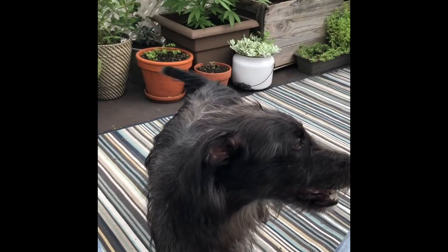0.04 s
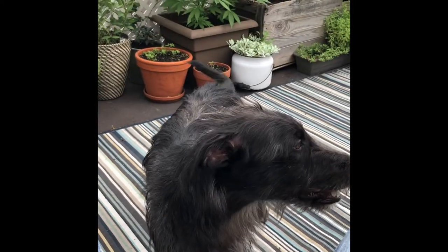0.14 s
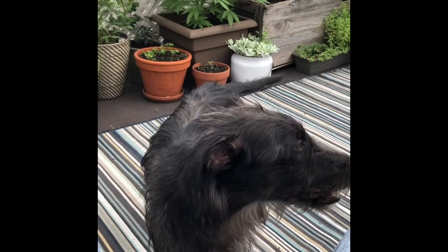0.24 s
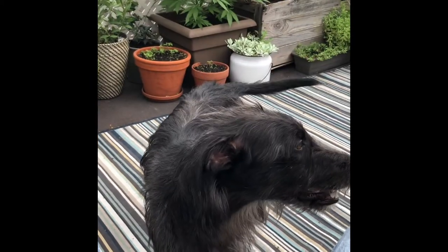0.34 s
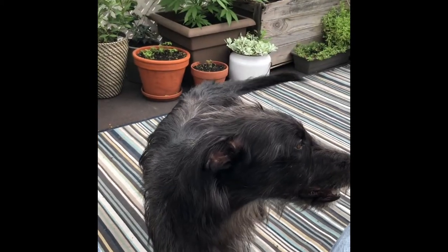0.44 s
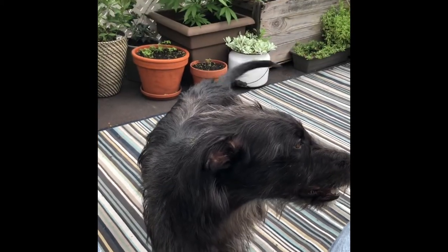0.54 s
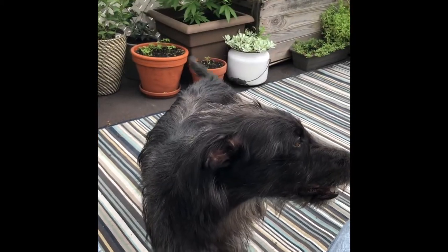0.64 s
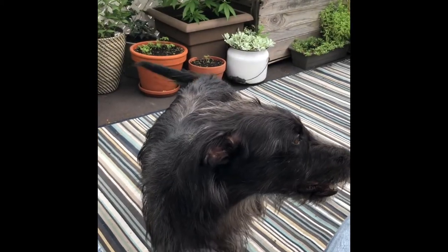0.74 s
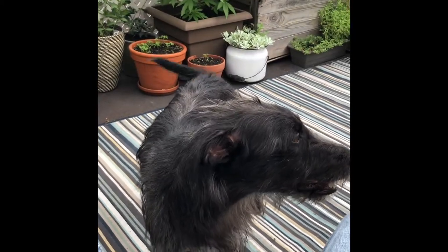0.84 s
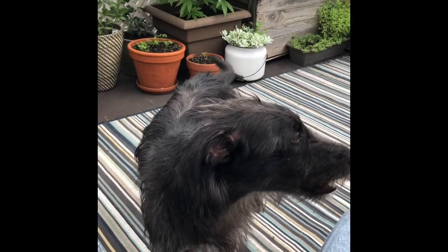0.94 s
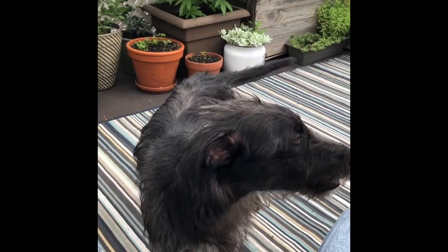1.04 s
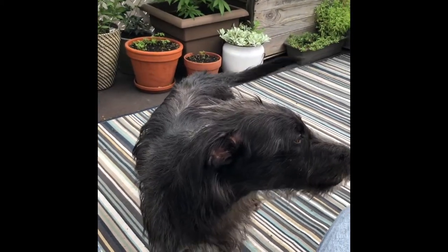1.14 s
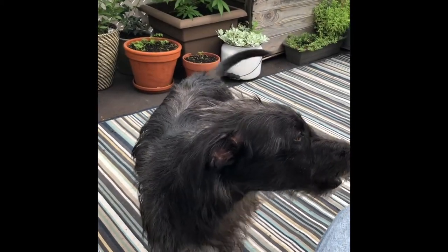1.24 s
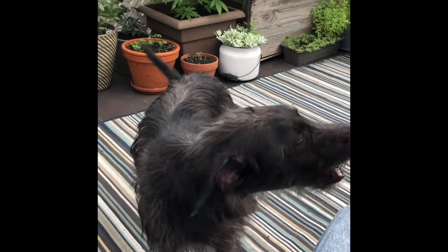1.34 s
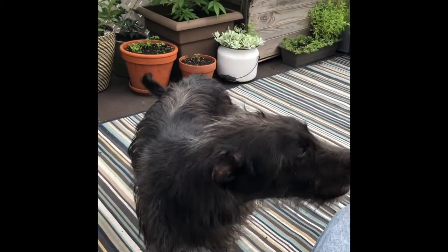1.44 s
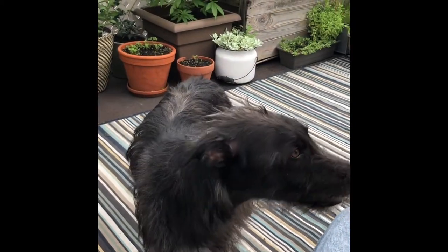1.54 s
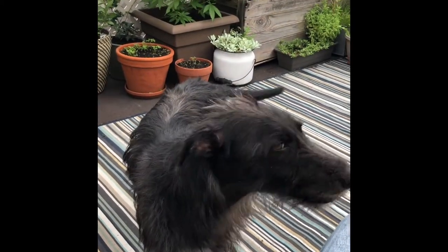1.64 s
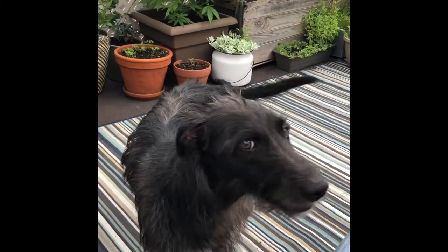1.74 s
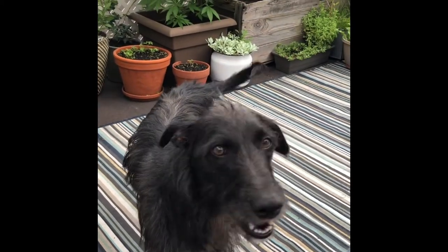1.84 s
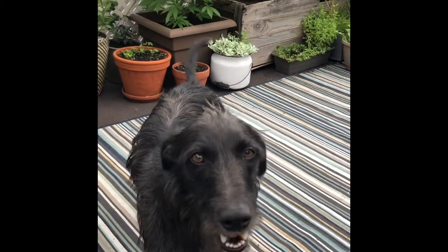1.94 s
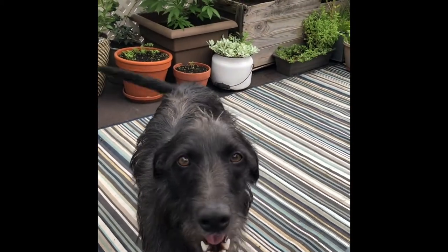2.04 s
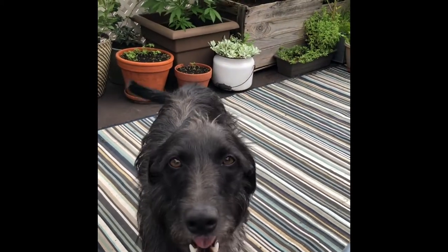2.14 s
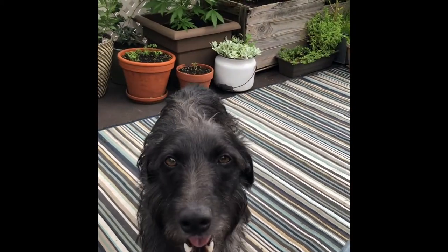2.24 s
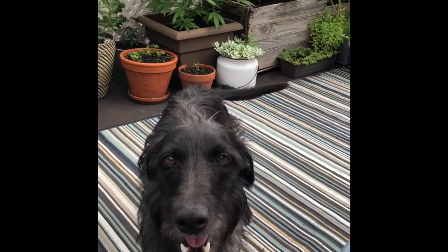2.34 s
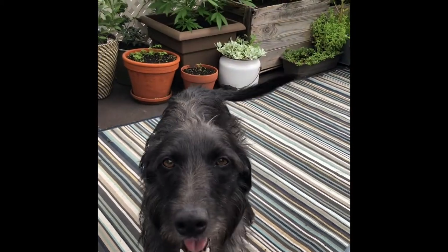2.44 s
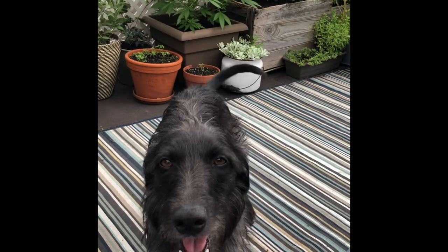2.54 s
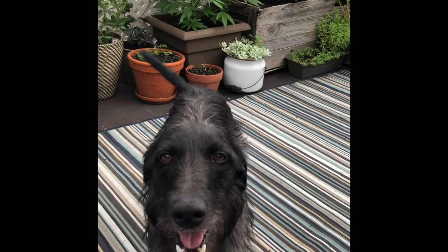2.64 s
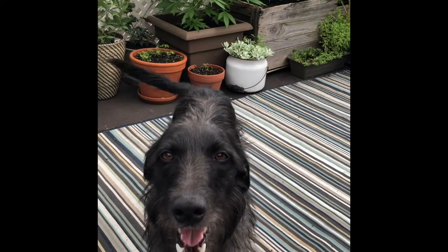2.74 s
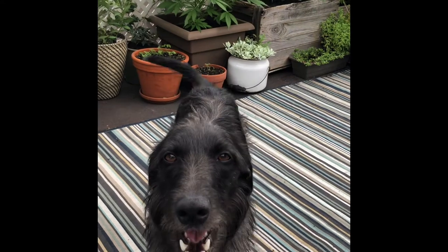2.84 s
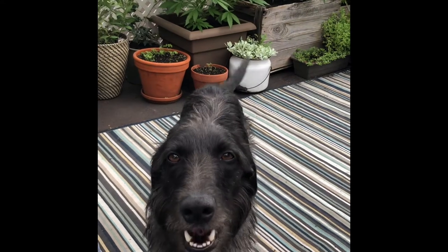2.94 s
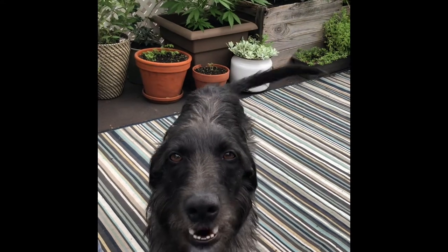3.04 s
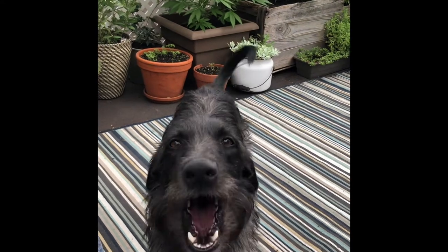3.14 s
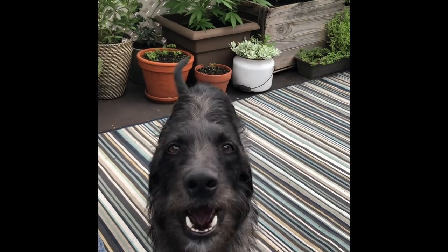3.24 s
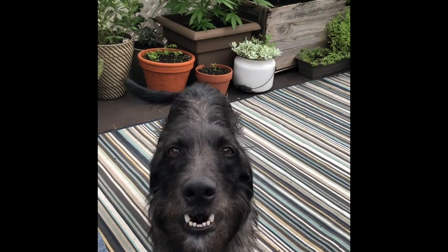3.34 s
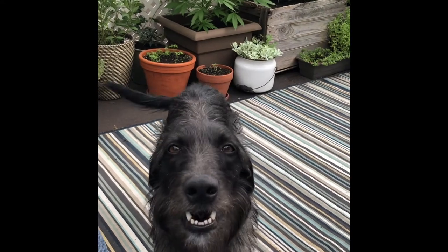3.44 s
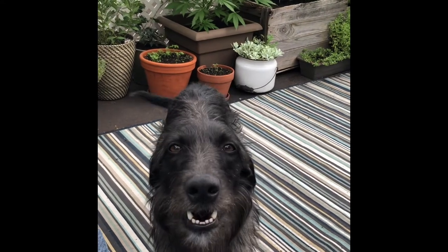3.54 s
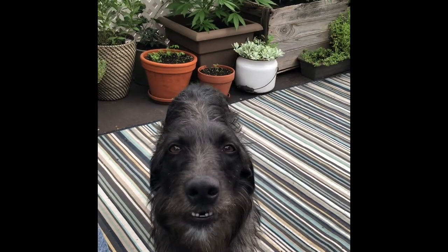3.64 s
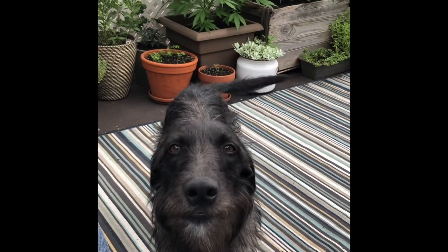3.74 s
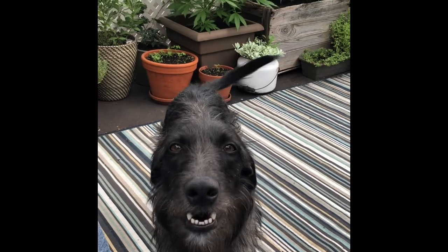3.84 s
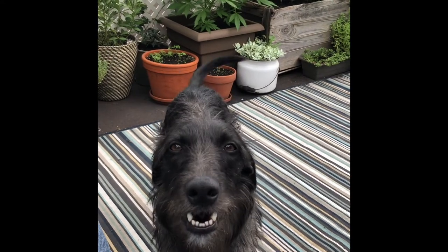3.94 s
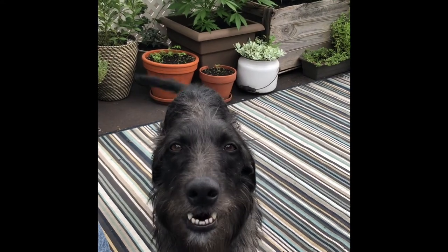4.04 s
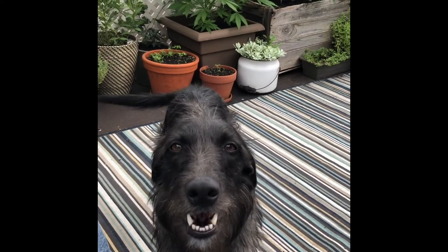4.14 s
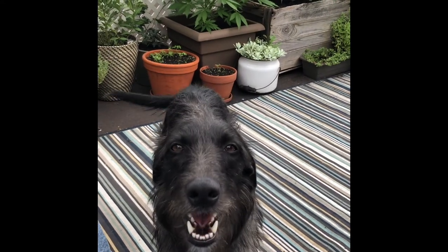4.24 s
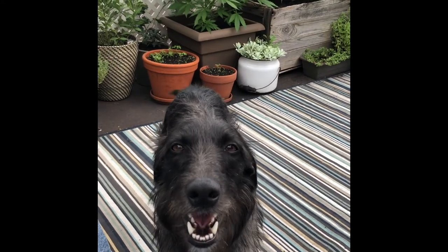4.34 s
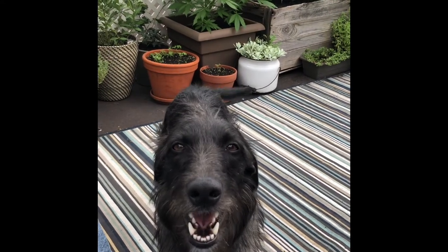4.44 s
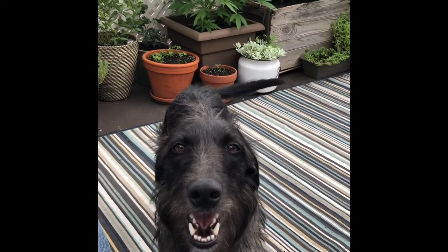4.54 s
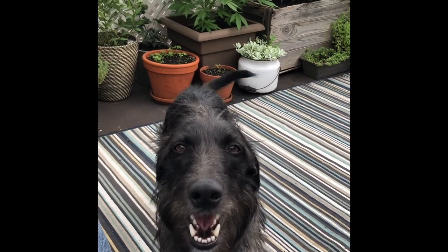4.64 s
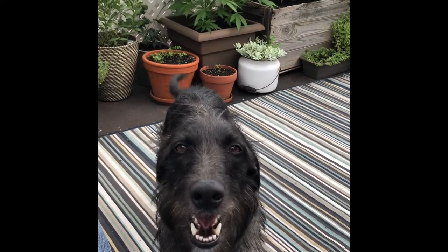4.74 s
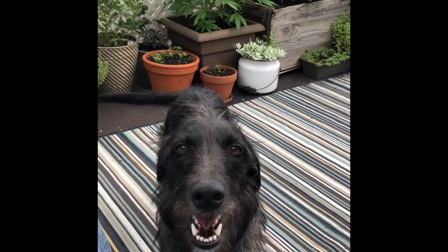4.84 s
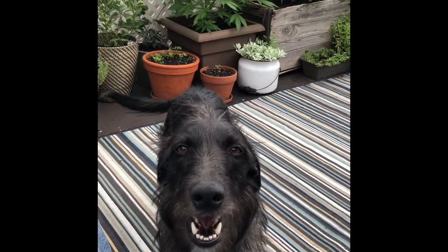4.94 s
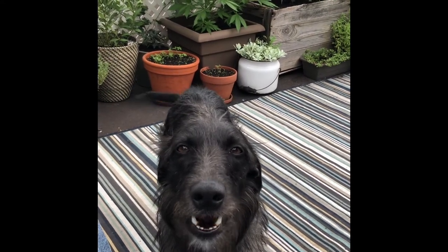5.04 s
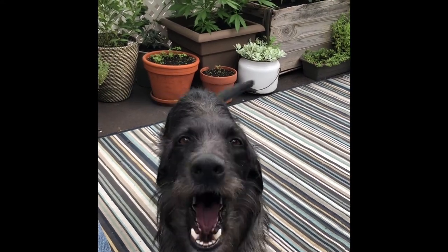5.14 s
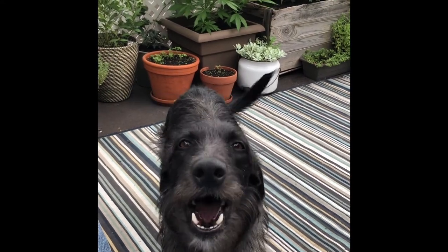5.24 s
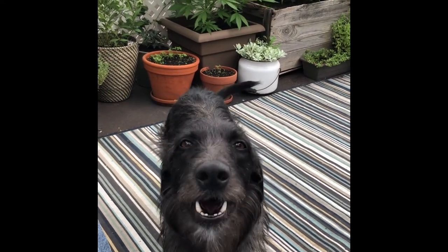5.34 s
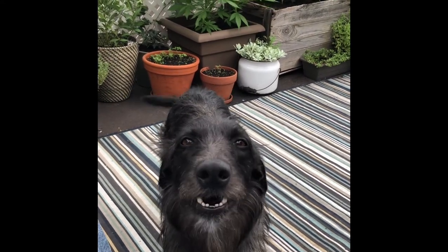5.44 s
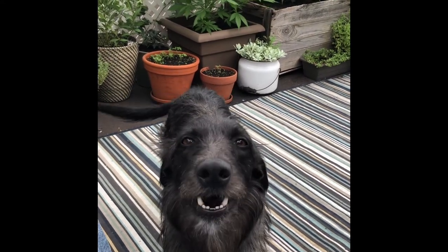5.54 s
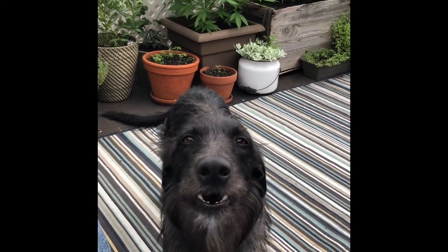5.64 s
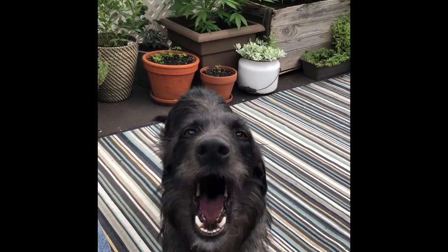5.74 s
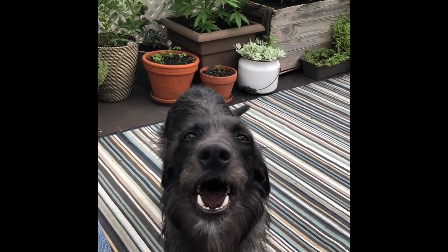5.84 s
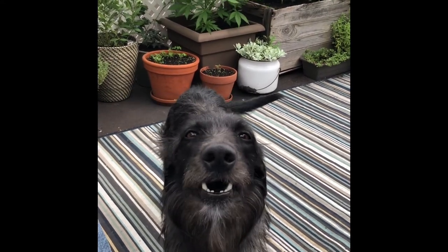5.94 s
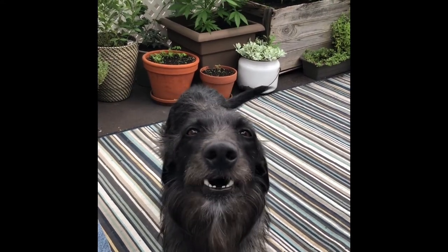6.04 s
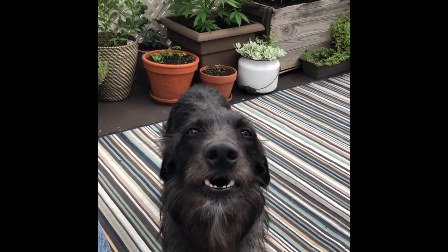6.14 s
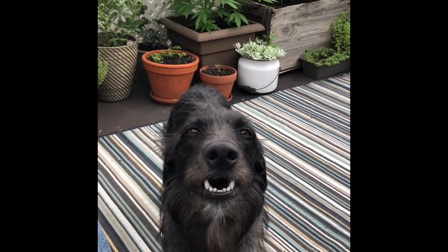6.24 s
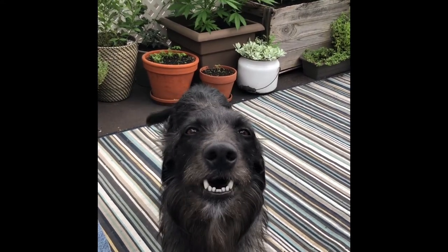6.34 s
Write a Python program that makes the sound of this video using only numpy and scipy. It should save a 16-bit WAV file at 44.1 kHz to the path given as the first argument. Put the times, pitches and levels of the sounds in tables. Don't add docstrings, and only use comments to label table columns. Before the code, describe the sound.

Soft, swelling road rumble and tyre hiss sit far behind a patio. Very near, a big dog lets out four loud, abrupt barks: one turned aside, one facing the microphone, then two in quick succession. Each has a hoarse cracked middle, breathy hiss past the teeth and a low thump of air. Small throat pops and wet lip clicks fill the gaps.

```python
import sys
import numpy as np
from scipy import signal
from scipy.fft import rfft, irfft, next_fast_len
from scipy.io import wavfile
from scipy.ndimage import uniform_filter1d, minimum_filter1d, map_coordinates

SR = 44100
rng = np.random.default_rng(int(sys.argv[2]) if len(sys.argv) > 2 else 0)


def voltage_ratio(decibels):
    exponent = np.asarray(decibels, float) / 20
    return 10 ** exponent


def output_pcm(signal):
    pcm = np.clip(np.atleast_2d(signal).T, -1, 1) * 32767
    wavfile.write(sys.argv[1], SR, np.round(pcm).astype(np.int16))


N = 281490

# (time [s], level [dB])
BACKGROUND_LEVEL = [(0, -59.5), (.25, -57.5), (1.19, -50.5), (1.4, -53), (2.27, -48), (2.72, -45), (3.05, -46),
                    (3.2, -50.5), (3.43, -58), (4.12, -55.5), (5.15, -45.5), (5.4, -53.5), (5.79, -51),
                    (6.04, -54), (6.38, -52.5)]
# (frequency [Hz], density [dB per Hz])
RUMBLE = [(12, -43), (20, -19), (43, -1.5), (86, -4), (120, 0.5), (161, -3.5), (203, -1), (300, -8),
          (338, -23.5), (500, -19.5), (650, -31.5), (1100, -120)]
TYRES = [(150, -29.5), (250, -7.5), (303, -3), (493, -7), (735, -7.5), (831, -9.5), (1450, -12.5),
         (3340, -27.5), (4260, -28.5), (15200, -46), (16000, -50.5)]
TYRES_DB, TYRES_GROW = -56.5, 1.1
# (time [s], pitch [Hz], level [dB])
ENGINE = [(0, 119.3, -77), (2.6, 116, -50), (3.2, 126, -61.5), (4.4, 123, -72.5), (5.3, 132, -54),
          (6.38, 141, -53)]

# (time [s], pitch [Hz], tone [dB], overtone slope [dB per octave], pulses [dB])
GROWL = [(1.149, 325.6, -72, -4, -55), (1.175, 327.3, -73, -6.5, -44.5), (1.211, 351, -70.5, -4, -39.5),
         (1.234, 389, -69.5, -6.5, -31.5), (1.251, 397, -69, -6, -47.5)]
# (frequency [Hz], width [Hz], level [dB])
CHEST = [(230, 63, -3), (480, 68, -0.5), (1250, 95, -19)]
# (time [s], pitch [Hz], tone [dB], overtone slope [dB per octave])
GLIDES = [
    [(1.222, 404.5, -49, -13), (1.243, 445, -24, -5), (1.255, 500.5, -14, -2), (1.267, 557.3, -8.5, -2),
     (1.285, 617.4, -3.5, -6), (1.305, 616.6, -4, -1), (1.32, 672.4, -16, 0), (1.343, 770, -7, -9.5)],
    [(3.085, 470.4, -32.5, -3), (3.091, 480.6, -5.5, -6), (3.11, 529.1, -2, -6.5), (3.128, 595.4, 1, -6),
     (3.145, 671.3, -20, -11.5), (3.175, 787.7, -22, 1), (3.198, 760, -16, -8)],
    [(5.05, 448.2, -55.5, -20), (5.072, 544.2, -13, -17.5), (5.088, 551.4, -6, -10),
     (5.098, 662.4, -9.5, -4), (5.114, 729, 0.5, -6.5), (5.13, 730, -4, -1), (5.142, 766.7, -15, -3),
     (5.203, 789.5, -14.5, -4)],
    [(5.646, 489, -46, -12), (5.66, 506.7, -20, -14), (5.68, 548.8, -14, -5), (5.692, 667.6, -7.5, -6.5),
     (5.715, 722, -2.5, -7), (5.728, 753.5, -13.5, -17), (5.768, 796.3, -14.5, -5)],
]
# (time [s], pulses [dB], build-up [s], fade [dB per s])
BREAKS = [(1.31, -7.5, .027, 247), (3.142, -4, .045, 293.5), (5.135, -8.5, .023, 201.5),
          (5.728, -8, .013, 280)]
# (time [s], tone [dB], pitch [Hz], last moan under the tone [dB])
SNAPS = [(1.354, -7.5, 669.4, -15), (3.201, -3, 684.4, -18), (5.208, -4, 676.7, -11),
         (5.777, -5, 717, -19.5)]
# (time after [s], share of its pitch, share of the drop to the moan, overtone slope [dB per octave], pulses [dB])
FALL = [(0, 1.001, .01, -8, -31.5), (.009, .9, .15, -9.5, -30.5), (.016, .7, 0.64, -6, -30),
        (.027, .5, 1.01, 0, -42.5), (.047, 0.35, 2.1, 3, -52.5)]
RASP_START_DB, RASP_DB = -51, -31
# (frequency [Hz], width [Hz], level [dB])
THROATS = [
    [(630, 10, -3), (770, 6.9, -6), (1103, 27, -9), (1663, 11, -18), (1940, 31, -20.5)],
    [(658, 23, -3), (1042, 22, -5.5), (1702, 60, -22.5), (1954, 22, -21.5), (2030, 19, -26)],
    [(573, 8, -1.5), (758, 20, -4), (1026, 93, -9), (1760, 60, -18), (1890, 27, -25.5)],
    [(644, 37, 2), (1020.5, 17, 1), (1243, 17, -16), (1505, 38, -10), (1954, 76, -17.5)],
]
# (frequency [Hz], level over the pulses [dB])
LOCKS = [
    (632, 7.5),
    (654.6, 2),
    (652, 5.5),
    (1008.7, 0),
    (480, -28.5),
]
# (frequency [Hz], gain [dB])
ASIDE = [(400, 7), (620, 1), (900, -12), (1130, -12.5), (1300, -24), (1600, -7.5), (1850, -5), (2200, -3.5),
         (2550, -21.5), (3100, -25.5), (4000, -54.5), (6000, -32.5), (9000, -50.5)]
FACING = [(400, 9.5), (700, -1.5), (1100, -1), (1250, -6), (1480, -5), (1800, -2), (2100, -11), (2600, -32),
          (3500, -18), (4400, -44), (5100, -23), (7200, -23.5), (10000, -34)]
CLOSING = [(250, -13.5), (420, -8.5), (560, -4), (660, 1), (850, -13.5), (1150, -4.5), (1400, -16),
           (1650, -8.5), (2000, -4), (2500, -29.5), (5000, -40), (9000, -41.5)]

# (time of full flow [s], teeth hiss [dB], time of puff, early in the first bark and
# closing the others [s], puff [dB])
BREATHS = [(1.274, -39, 1.2, -61), (3.098, -30, 3.228, -34), (5.11, -31, 5.25, -37.5),
           (5.698, -31, 5.816, -47.5)]
# (time from full flow [s], level under it [dB])
FLOW_RISE = [(-.06, -43), (-.03, -27.5), (0, -0.4)]
# (time from the snap-back [s], level under full flow [dB])
FLOW_FALL = [(-.012, -3), (0, -6.5), (.012, -14), (.035, -13), (.1, -47.5)]
# (frequency [Hz], density [dB per Hz])
SIDE_TEETH = [(2820, -41), (4800, -13.5), (5390, -2), (5990, -1), (7940, -8), (8830, -12.5), (10300, -20.5),
              (11900, -16.5), (16000, -24)]
TEETH = [(2820, -46), (4800, -14.5), (5310, -3), (5810, -3), (8830, 3), (9380, -2.5), (10200, -9.5),
         (14500, -6), (16000, -11)]
LIPS = [(1500, -50.5), (2700, -23.5), (3500, 1), (4200, -0.5), (5000, -7.5), (5800, -19), (8000, -61)]
PHARYNX = [(1200, -38.5), (2300, -2.5), (2900, 4.5), (3700, -0.5), (4400, -14.5), (6000, -38)]
WHISTLE = [(8000, -40), (8800, -3), (9100, 0.5), (9400, -6), (10000, -40)]
SIZZLE = [(9500, -29.5), (11000, -2.5), (14800, 0.5), (16000, -3)]
LEAK_DB, LEAK_SAG_DB = -17.5, -10.5
PUFF_RISE_S, PUFF_FALL_S, PUFF_REST_DB = 0.022, 0.073, -75.5
RASP_AIR_DB = -10
WHISTLE_DB, WHISTLE_GROWS = -14.5, .55
SIZZLE_DB = 6

# (frequency [Hz], t60 [s])
PATIO = [(200, 0.3), (700, 0.47), (2000, 0.73), (3500, 0.083), (10000, 0.11)]
# (delay [s], level [dB])
WALLS = [(.145, -40), (.19, -50), (.27, -55), (.35, -60)]
# (time [s], level [dB])
TOWARD_WALL = [(1.3, 2.5), (3.1, -14.5), (5.1, -6.5), (5.7, -13.5)]

# (time [s], peak [dB], centre [Hz], t60 [s])
SMACKS = [(1.8543, -50.5, 6440, 0.038), (2.172, -58, 4740, 0.035), (2.824, -50.5, 4400, 0.035),
          (3.025, -49, 10200, 0.035), (3.0414, -46.5, 3300, 0.035), (3.702, -52, 4860, 0.035),
          (3.714, -52, 3440, 0.033), (3.7208, -52, 4150, 0.047), (4.9561, -47, 3430, 0.037),
          (4.968, -41.5, 3560, 0.029), (4.9745, -54, 3040, 0.031), (5.0447, -49, 2980, 0.035),
          (5.6216, -51, 3210, 0.04)]
# (time [s], level [dB], length [s])
RUSTLES = [(2.165, -67, .016), (2.55, -70.5, .07), (2.68, -67, .06), (2.79, -70, 0.066), (4.95, -67, .04)]
# (time [s], peak [dB], ring [Hz])
CREAKS = [(3.053, -25.5, 580), (3.063, -16, 530), (3.072, -10.5, 550), (3.081, -6, 481.4),
          (3.664, -44, 360), (3.676, -39.5, 514), (4.97, -33.5, 574), (4.98, -27.5, 635),
          (4.994, -31.5, 686)]
CREAK_T60_S, CREAK_ATTACK_S = .022, 0.00049


def unit(x):
    return x / np.sqrt(np.mean(x ** 2) + 1e-20)


def along(points, hz):
    f, v = np.transpose(points)
    return np.interp(np.log(hz + 1), np.log(f + 1), v)


def stretch(rows):
    s, *cols = np.transpose(sorted(rows))
    start = round(s[0] * SR)
    t = np.arange(start, min(N, round(s[-1] * SR))) / SR
    return start, [np.interp(t, s, c) for c in cols]


def wobble(n, rate):
    knots = rng.standard_normal(int(n * rate / SR) + 4)
    return map_coordinates(knots, [np.arange(n) * rate / SR])


def filtered(x, response):
    m = next_fast_len(len(x) + 8192)
    return irfft(rfft(x, m) * response(np.fft.rfftfreq(m, 1 / SR)), m)[:len(x)]


def noise(n, spectrum):
    return unit(filtered(rng.standard_normal(n), lambda hz: voltage_ratio(along(spectrum, hz))))


def mottled(x, patchy_db):
    z = signal.stft(x, nperseg=128)[2]
    field = uniform_filter1d(rng.standard_normal(z.shape), size=2, axis=0)
    field = uniform_filter1d(field, size=22, axis=1)
    return unit(signal.istft(z * voltage_ratio(patchy_db * unit(field)), nperseg=128)[1][:len(x)])


def add(out, start, x):
    out[start:start + len(x)] += x[:len(out) - start]


def traffic():
    out = np.zeros(N)
    start, (rumble_db,) = stretch(BACKGROUND_LEVEL)
    hiss_db = TYRES_DB + TYRES_GROW * (rumble_db - rumble_db.mean())
    n = len(hiss_db)
    add(out, start, voltage_ratio(rumble_db + 1.2 * wobble(n, 2.5)) * noise(n, RUMBLE))
    add(out, start, voltage_ratio(hiss_db + .8 * wobble(n, 12)) * noise(n, TYRES))
    start, (hz, note_db) = stretch(ENGINE)
    n = len(hz)
    turns = np.cumsum(hz + 5 * wobble(n, 9.4)) / SR
    add(out, start, voltage_ratio(note_db + 1.1 * wobble(n, 7.3)) * np.sin(2 * np.pi * turns))
    return out


def effort(glide, breaking, snap):
    at, pulses_db, build, fade = breaking
    back, tone_db, hz, moan_db = snap
    clear = glide + [(back + s, hz * share, tone_db + drop * moan_db, slope) for s, share, drop, slope, _ in FALL]
    last = glide[-1][0]
    rough = [(glide[0][0], RASP_START_DB), (at - build, RASP_DB), (at, pulses_db)]
    rough += [(last, pulses_db - fade * (last - at))]
    rough += [(back + row[0], row[-1]) for row in FALL]
    s, pitch, level_db, slope = np.transpose(sorted(clear))
    t = np.arange(s[0], s[-1], 1 / 1000)
    swell_db = 40 * np.log10(np.interp(t, s, voltage_ratio(level_db / 2)))
    chaos_db = np.interp(t, *np.transpose(sorted(rough)))
    return list(zip(t, np.interp(t, s, pitch), swell_db, np.interp(t, s, slope), chaos_db))


def clear_tone(pitch, cycles, tone_db, slope_db, mouth):
    n = len(pitch)
    k = np.arange(1, 19)[:, None]
    shutting = np.clip((np.arange(n) - np.argmax(pitch)) / (0.012 * SR), 0, 1)
    tract_db = (1 - shutting) * along(mouth, k * pitch) + shutting * along(CLOSING, k * pitch)
    tract_db -= 9 * shutting * np.clip((540 - pitch) / 150, 0, 1) * np.log2(np.maximum(k / 2, 1))
    unsteady_db = 3.5 * (k > 1) * np.array([wobble(n, 70) for _ in k])
    gains = voltage_ratio(slope_db * np.log2(k) + tract_db + unsteady_db)
    return voltage_ratio(tone_db) * np.sum(gains * np.cos(2 * np.pi * k * cycles + .45 * k * k), 0)


def chaotic_pulses(pitch, cycles, chaos_db, throat, lock):
    n = len(pitch)
    closing = np.flatnonzero(np.diff(np.floor(cycles)))
    draw = rng.standard_normal((400, 2))[:len(closing)]
    at = np.clip(closing + .35 * draw[:, 0] * SR / pitch[closing], 0, n - 1).astype(int)
    pulses = np.bincount(at, voltage_ratio(3.8 * draw[:, 1]), n)

    def throat_response(f):
        ring = 0
        for i, (centre, width, db) in enumerate(throat):
            w = width + 22
            ring = ring + (-1) ** i * voltage_ratio(db) * 1j * f * w / (centre * centre - f * f + 1j * f * w)
        low_cut = (1j * f / (300 + 1j * f)) ** 2
        return ring * low_cut / (1 + (1j * f / 2250) ** 2 + 1j * f / 3200) ** 2

    rung = unit(filtered(pulses, throat_response))
    swing = np.abs(uniform_filter1d(uniform_filter1d(rung ** 2, size=400), size=300)) + 0.045
    chaos = voltage_ratio(chaos_db) * rung / swing ** .4
    drift = np.cumsum(lock[0] + 9 * wobble(n, 90)) / SR
    return chaos + voltage_ratio(chaos_db + lock[1] + 2.2 * wobble(n, 160)) * np.sin(2 * np.pi * drift)


def call(rows, throat, mouth, lock):
    start, (pitch, tone_db, slope_db, chaos_db) = stretch(rows)
    n = len(pitch)
    cycles = np.cumsum(pitch * (1 + .006 * wobble(n, 150))) / SR
    voice = clear_tone(pitch, cycles, tone_db, slope_db, mouth)
    voice = voice + chaotic_pulses(pitch, cycles, chaos_db, throat, lock)
    return start, voice * np.clip(np.arange(n)[::-1] / (.01 * SR), 0, 1)


def growl_and_barks():
    out = np.zeros(N)
    efforts = [effort(*parts) for parts in zip(GLIDES, BREAKS, SNAPS)] + [GROWL]
    mouths = [ASIDE, FACING, FACING, FACING, ASIDE]
    for parts in zip(efforts, THROATS + [CHEST], mouths, LOCKS):
        add(out, *call(*parts))
    return out


def breath(full, hiss_db, puff, puff_db, back, teeth):
    rise = [(full + s, hiss_db + db) for s, db in FLOW_RISE]
    fall = [(back + s, hiss_db + db) for s, db in FLOW_FALL]
    start, (flow_db,) = stretch(rise + fall)
    n = len(flow_db)
    t = (start + np.arange(n)) / SR
    leak = voltage_ratio(flow_db + LEAK_DB + LEAK_SAG_DB * np.clip((t - full) / (back - full), 0, 1))
    puff_times = [puff - PUFF_RISE_S, puff, puff + PUFF_FALL_S]
    burst = voltage_ratio(np.interp(t, puff_times, [puff_db - 20, puff_db, PUFF_REST_DB], left=-120))
    flutter = unit(voltage_ratio(2.1 * wobble(n, 250) + 1.4 * wobble(n, 1300)))
    air = voltage_ratio(flow_db) * mottled(noise(n, teeth), patchy_db=2.5)
    air += (leak + burst) * noise(n, LIPS)
    air += voltage_ratio(flow_db + RASP_AIR_DB + 1.5 * wobble(n, 300)) * noise(n, PHARYNX)
    jet_db = hiss_db + WHISTLE_DB + WHISTLE_GROWS * (flow_db - hiss_db)
    air += voltage_ratio(jet_db) * np.hanning(n) * noise(n, WHISTLE)
    air += voltage_ratio(SIZZLE_DB) * leak * noise(n, SIZZLE)
    return start, flutter * air


def breaths():
    out = np.zeros(N)
    for air, snap, teeth in zip(BREATHS, SNAPS, [SIDE_TEETH, TEETH, TEETH, TEETH]):
        add(out, *breath(*air, snap[0], teeth))
    return out


def air_blast(voice):
    return voltage_ratio(-30.0) * filtered(voice ** 2, lambda f: 1 / (1 + (f / 120) ** 4))


def patio(x):
    hz, t, z = signal.stft(rng.standard_normal(SR // 2), SR, nperseg=256)
    tail = signal.istft(z * voltage_ratio(-60 * t / along(PATIO, hz)[:, None]), SR, nperseg=256)[1]
    wet = voltage_ratio(-31.0) * signal.fftconvolve(np.pad(x, (700, 0)), tail / np.linalg.norm(tail))[:N]

    def slaps(f):
        echoes = sum(voltage_ratio(db) * np.exp(-2j * np.pi * f * s) for s, db in WALLS)
        favoured = 1 + 1.3 / (1 + ((f - 625) / 60) ** 2)
        return echoes / (1 + (f / 1100) ** 2) * favoured

    aim = voltage_ratio(np.interp(np.arange(N) / SR, *np.transpose(TOWARD_WALL)))
    return wet + filtered(x * aim, slaps)


def lip_smacks():
    out, t = np.zeros(N), np.arange(SR // 40) / SR
    for s, db, hz, t60 in SMACKS:
        snap = noise(len(t), [(hz * 0.29, -30), (hz, 0), (hz * 1.0, -8), (hz * 3.5, -35)])
        add(out, round(s * SR), voltage_ratio(db - 7.5 - 60 * t / t60) * snap)
    return out


def fur_rustles():
    out = np.zeros(N)
    for s, db, length in RUSTLES:
        n = round(length * SR)
        add(out, round(s * SR), voltage_ratio(db + 2.7 * wobble(n, 300)) * np.hanning(n) * noise(n, TEETH))
    return out


def throat_creaks():
    out, t = np.zeros(N), np.arange(SR // 40) / SR
    for s, db, hz in CREAKS:
        envelope = voltage_ratio(db + 3 - 60 * t / CREAK_T60_S) * (1 - np.exp(-t / CREAK_ATTACK_S))
        add(out, round(s * SR), envelope * np.sin(2 * np.pi * hz * t))
    return out


def scene():
    road = traffic()
    dog = growl_and_barks() + breaths() + lip_smacks() + fur_rustles() + throat_creaks()
    return (road + dog + air_blast(dog) + patio(dog))[None]


def low_pass(x):
    return signal.sosfilt(signal.butter(12, 16240, fs=SR, output="sos"), x)


def record(dry):
    need = np.minimum(1, .86 / (np.abs(dry) + 1e-9))
    limited = dry * uniform_filter1d(minimum_filter1d(need, size=260), size=130)

    def phone_band(f):
        bass_cut = 1j * f / (40 + 1j * f) * 1j * f / (25 + 1j * f)
        return np.clip((15900 - f) / 150, 0, 1) * bass_cut

    mix = filtered(limited[0], phone_band)[None]
    return low_pass(mix)


dry = scene()
out = record(dry)
output_pcm(out)
```